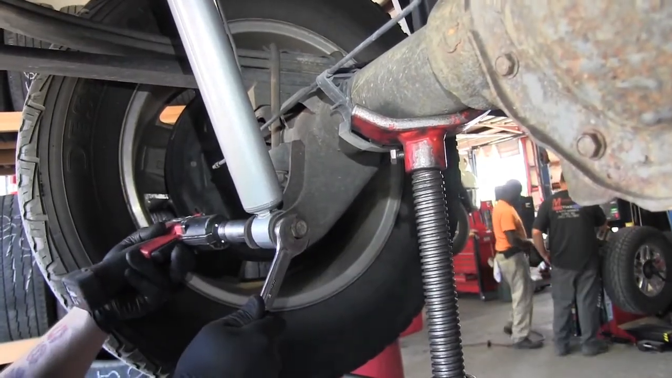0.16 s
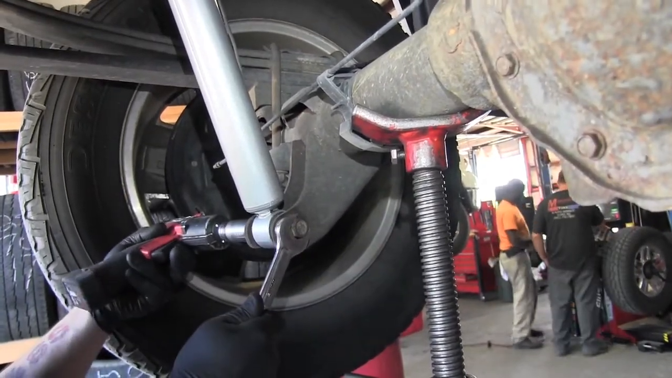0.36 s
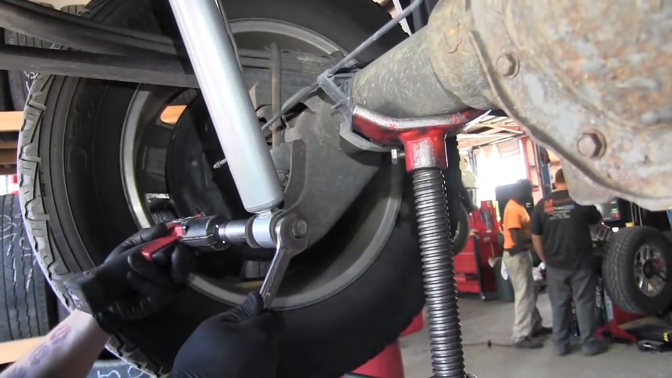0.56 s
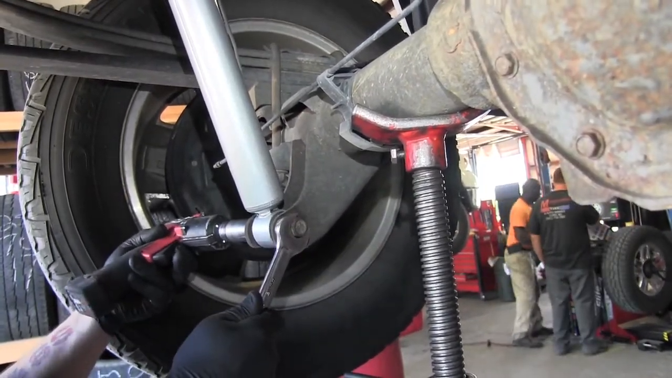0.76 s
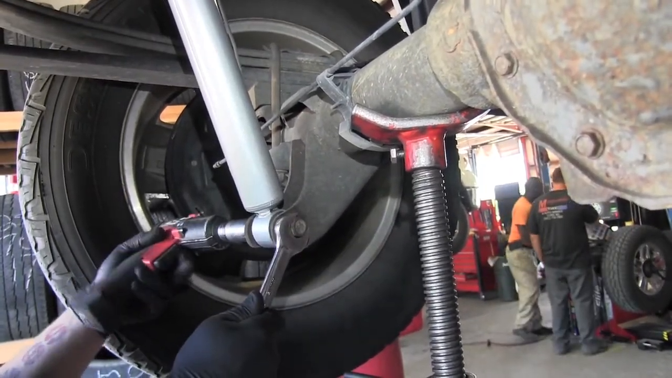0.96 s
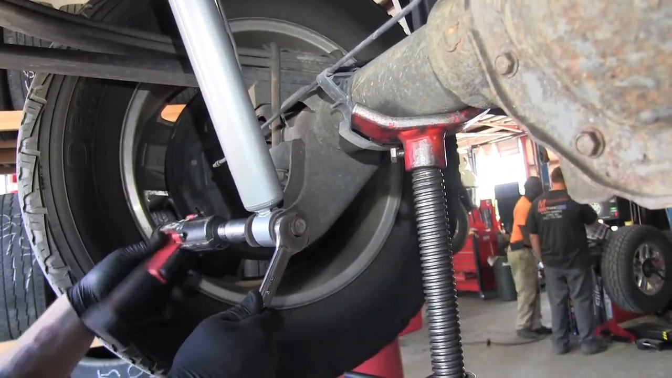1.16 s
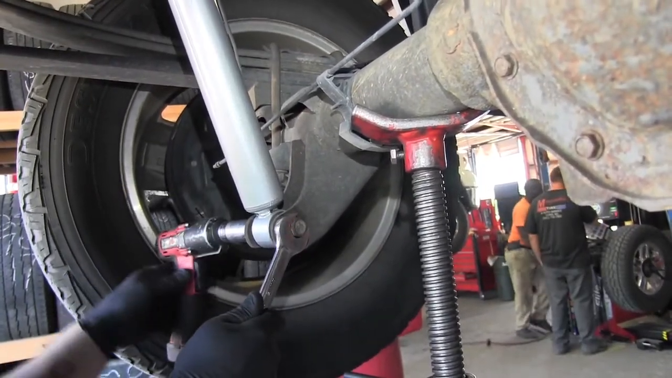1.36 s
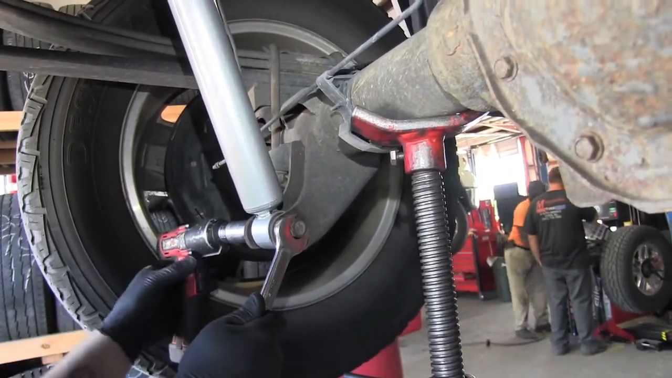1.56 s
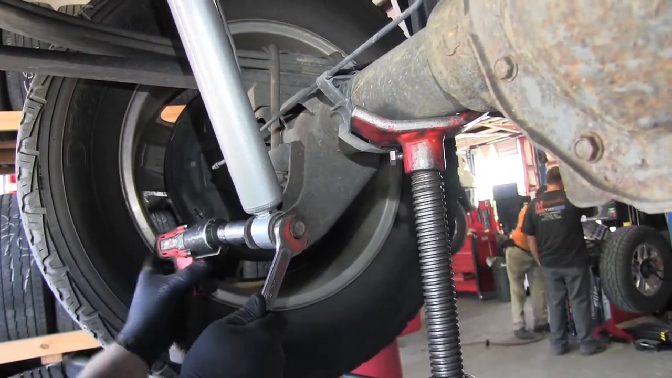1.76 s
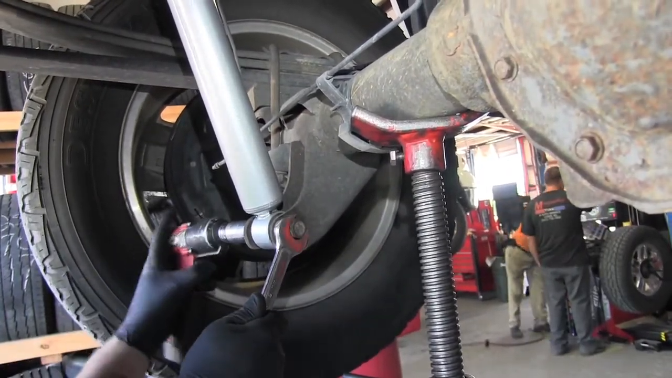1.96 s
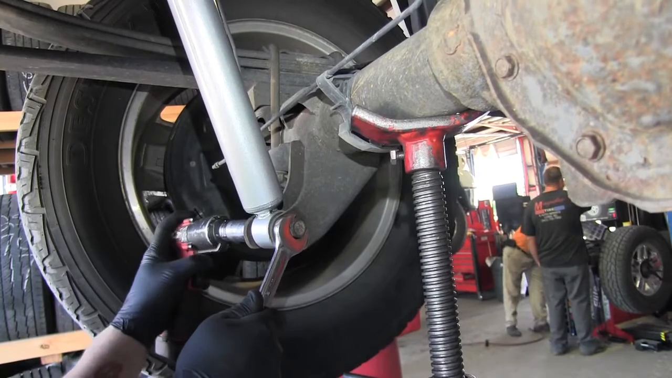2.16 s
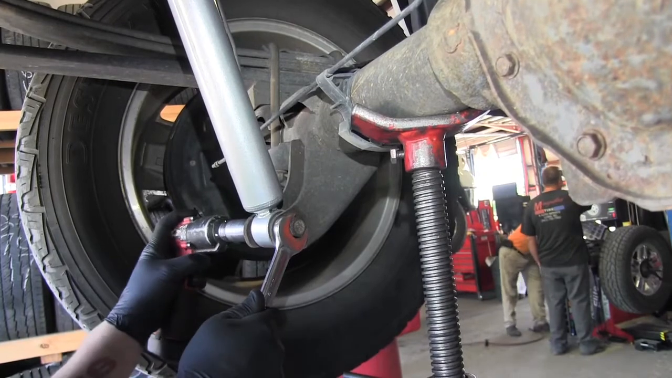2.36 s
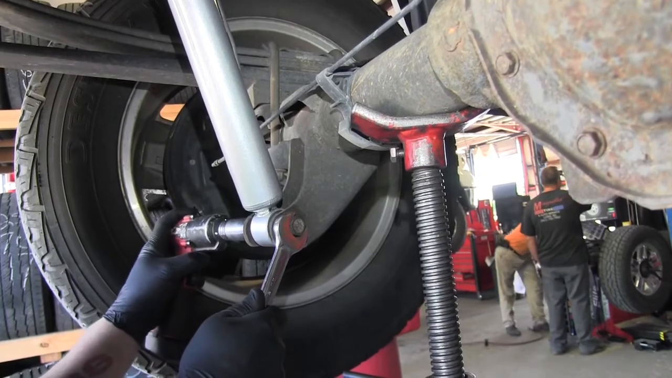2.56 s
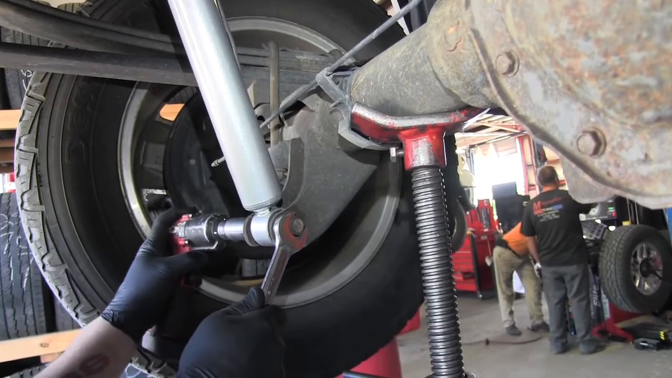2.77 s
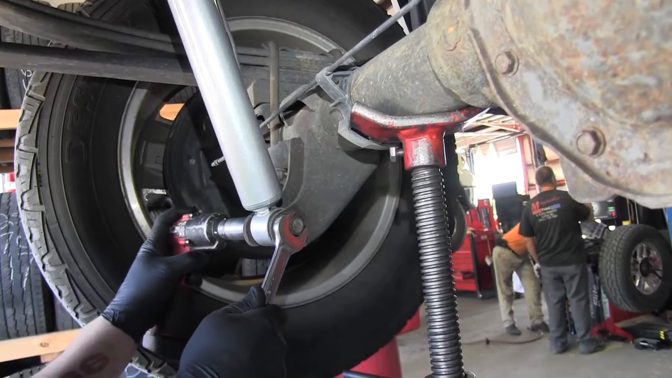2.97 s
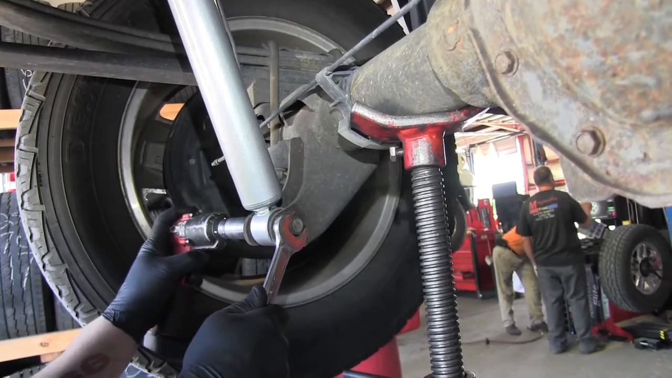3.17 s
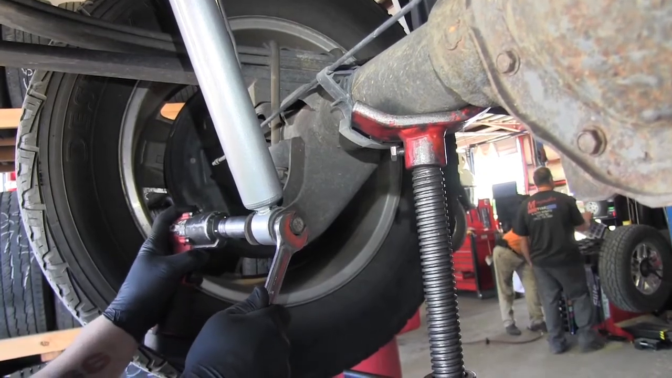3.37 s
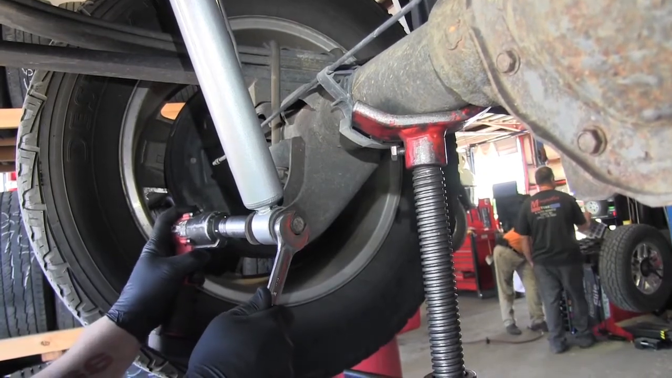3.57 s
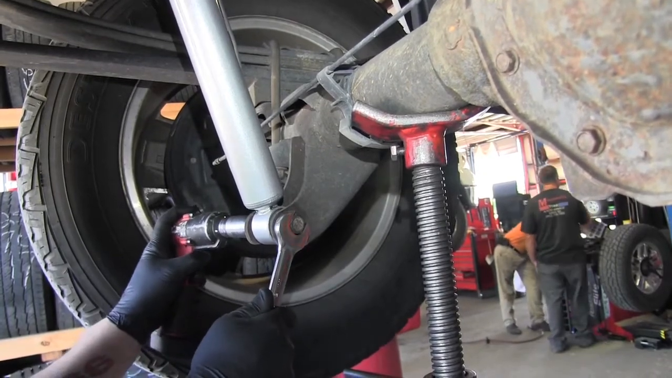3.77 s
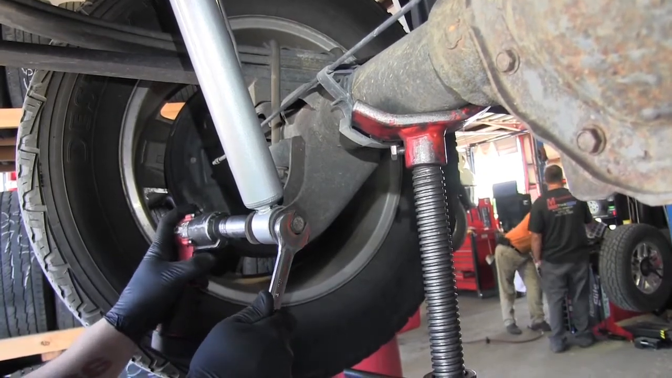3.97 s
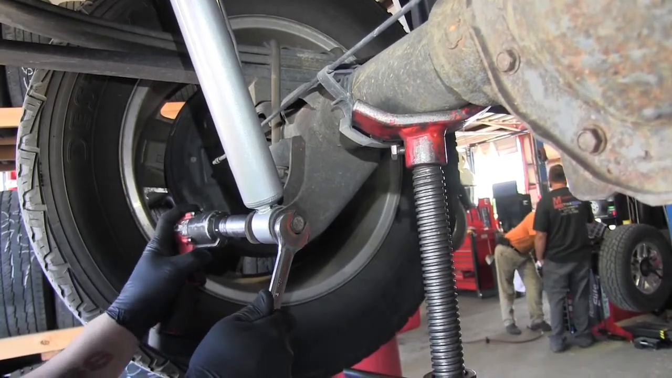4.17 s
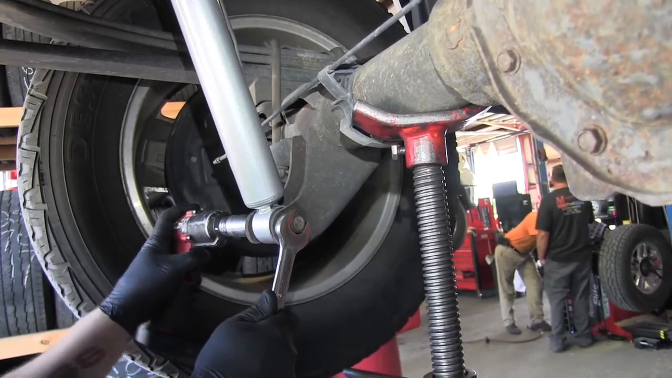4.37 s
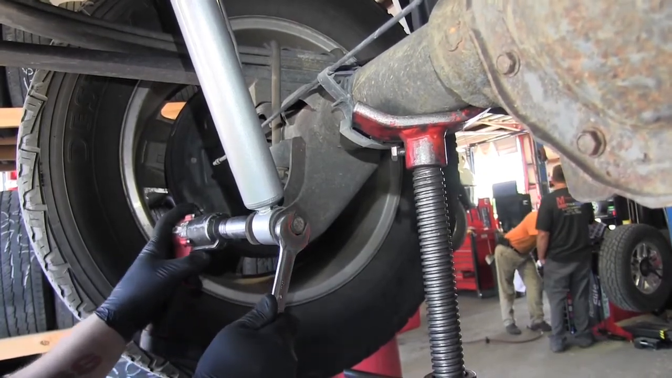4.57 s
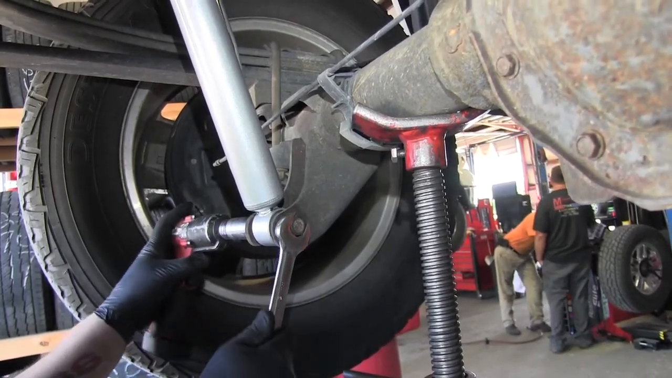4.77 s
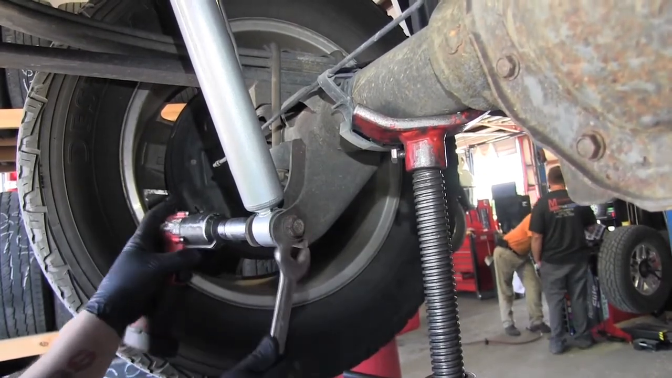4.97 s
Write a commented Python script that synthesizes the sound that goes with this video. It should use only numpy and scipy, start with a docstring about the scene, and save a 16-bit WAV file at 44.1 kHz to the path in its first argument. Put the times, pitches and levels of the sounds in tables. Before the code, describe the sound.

A power tool drives an axle bolt in three bursts of rapid metallic hammering and motor whirr, heard from close by. The first lasts about a second, with an overtone rising as it speeds up. In the pause come a socket knock and some glove scraping. The second burst is the longest, and the last is a quick blip. A low rumble, hum and faint hiss of the workshop lie underneath.

```python
"""A cordless impact driver hammers a bolt on a vehicle axle in three bursts, close up in a workshop.
Each blow chatters through the socket, bolt and axle, which ring; the motor whirrs between blows, and an
overtone rises as the first burst speeds up. After each burst the hall's noisy tail dies away over a faint
hiss. A low rumble and a hum lie underneath; glove and tool scrape, and the socket knocks as it reseats."""
import sys
import numpy as np
from scipy import signal
from scipy.fft import rfft, irfft, next_fast_len
from scipy.io import wavfile
from scipy.ndimage import uniform_filter1d, map_coordinates

SR = 44100
rng = np.random.default_rng(int(sys.argv[2]) if len(sys.argv) > 2 else 0)


def log_audio(samples):
    """Write samples as a 16-bit WAV file to the path given in sys.argv[1]."""
    # one column per channel
    frames = np.atleast_2d(samples).T
    # limit to full scale, then quantise
    limited = np.clip(frames, -1, 1)
    pcm = np.round(limited * 32767).astype(np.int16)
    wavfile.write(sys.argv[1], SR, pcm)


N = 221545

# Levels are relative: each layer adds its own trim.
# Faders while the trigger is held, one list a burst: t/s, whirr/dB, treble of the blows/dB,
# focus on the favoured ring/dB, then level/dB of each of the four AXLE_MODES parts
BURST_FADERS = [
    [(0, -23, -22, 5, -30, -25, -25, -37), (0.47, -26, -21, 5, -32, -25, -26, -40),
     (0.56, -25, -23, 7, -27, -29, -23, -47), (0.7, -21, -22.5, 5, -30, -36, -22, -47),
     (0.95, -21, -23.5, 5, -30, -36, -25, -40), (1.08, -21, -23, 6, -27, -33, -37, -25),
     (1.2, -27, -45, 6, -26, -29, -42, -47)],
    [(2.41, -32, -19.5, 12, -24, -28, -20, -26), (2.56, -22, -19.5, 15, -23, -33, -33, -32),
     (2.7, -24, -20.5, 17, -34, -33, -42, -28), (3.13, -22, -18, 13, -30, -33, -50, -31),
     (3.2, -23, -18, 14, -35, -24, -45, -31), (3.4, -22, -20, 16, -35, -23.5, -31, -29),
     (3.6, -21.5, -22.5, 14, -27, -27, -28, -19), (3.8, -21, -22, 13, -26, -27, -29, -18),
     (3.92, -22, -21, 12, -34, -26, -37, -21), (4.03, -18, -26, 9, -28, -27, -36, -24),
     (4.09, -32, -36.5, 9, -31.5, -28.5, -36, -27)],
    [(4.376, -36, -21, 18, -34, -30, -42, -18), (4.39, -28, -18.5, 18, -27, -26, -38, -15),
     (4.48, -20, -20, 16, -27, -26, -38, -18), (4.57, -20, -22.5, 15, -30, -25, -34, -23),
     (4.63, -28.5, -23, 11, -39, -44, -36, -31.5)],
]
CLATTER_EQ = [(290, -37), (500, 0), (641, -3.5), (786, 4), (1080, -1.5), (1410, -4), (2250, -1.5),
              (5980, -13.5), (7440, -19.5), (13200, -24), (16400, -34)]  # broad colour of motor and blows: f/Hz, level/dB
RUMBLE_FADERS = [(0, -35, -51), (0.6, -35.5, -52), (0.8, -36, -38), (1.0, -37, -55), (1.25, -36.5, -45),
                 (1.6, -42, -46), (1.9, -46, -38), (2.1, -43, -40), (2.17, -33, -37), (2.27, -39, -37),
                 (2.34, -35, -32), (2.39, -43, -36), (2.47, -32, -40), (2.6, -36, -54), (3.2, -43, -65),
                 (3.7, -45, -60), (4.1, -46, -57), (4.3, -52, -60), (4.65, -44, -58), (5.02, -60, -63)]  # the low bed: t/s, drone/dB, buffeting/dB
DRONE_EQ = [(65, -61), (110, -9.5), (180, -3), (270, -6), (400, -8), (480, -17), (700, -20), (910, -35),
            (1540, -120)]  # colour of the low drone: f/Hz, level/dB
BUFFET_EQ = [(15, -35.5), (30, -20), (60, -15), (100, 2.5), (140, -14), (250, -58.5)]  # colour of the deep buffeting: f/Hz, level/dB
HUM_FADER = [(0, -50), (1.45, -56), (2.3, -60), (4.1, -51), (4.32, -54), (4.68, -48), (5.02, -63)]  # the hum in the shop: t/s, level/dB
HUM_MODES = [(345, 50, -8), (440, 100, 0)]  # its resonant filter, applied twice: f/Hz, width/Hz, level/dB
# Uneven blows, as the hammer labours, catches or stalls: t/s, level/dB, favoured ring/Hz
UNEVEN_BLOWS = [(0.0202, -1, 2910), (0.0631, -2, 3800), (0.1052, -2, 2220), (0.1498, -0.5, 2900),
                (0.194, -2, 1700), (0.2397, -1, 1100), (0.2896, -1, 3800), (0.3296, -1, 3500),
                (0.3657, -1, 3800), (0.411, -0.5, 3790), (0.4483, -1, 2710), (0.4939, -2, 2340),
                (0.5108, -3, 2460), (0.5289, -2, 2980), (0.5497, -3, 2220), (1.0759, -5.5, 3050),
                (1.0984, -3, 2200), (1.1352, -4, 3460), (1.1638, -11, 2230), (1.1861, -14, 2710),
                (2.4083, -12, 3110), (2.4218, 0, 2290), (4.0166, -6, 3500), (4.0516, -8.5, 2230),
                (4.0695, -11, 2110), (4.3633, -24, 2260), (4.5698, -6, 5450), (4.5982, -7, 3720),
                (4.6072, -10, 5450)]
# Even hammering, one list a run, every row on a blow:
# t/s, blow rate up to the next row/Hz, level/dB, low ring/Hz, high ring/Hz, chance of the high ring (0-1)
EVEN_RUNS = [
    [(0.572, 50, -3, 2800, 4030, .6), (0.611, 52, -5.5, 2800, 4100, .5), (0.6891, 52, -5.5, 2700, 4500, .7),
     (0.7857, 52, -3, 2250, 4200, .55), (0.92, 52, -4, 2300, 3800, .55), (1.0549, 52, -4, 2200, 3640, .3)],
    [(2.4462, 50.5, -2, 2650, 4170, .15), (2.6436, 51, -3, 2410, 4170, .1),
     (2.7215, 52.5, -3.5, 2400, 4200, .1), (2.7784, 52, -3, 2380, 4500, .1),
     (2.8942, 52, -5, 2500, 5400, .5), (2.9905, 52, -5.5, 2700, 4900, .8),
     (3.1057, 53.5, -6, 2290, 5300, .6), (3.3661, 51.5, -5, 2300, 5500, .5),
     (3.4245, 54, -4, 2200, 5830, .8), (3.5537, 55, -4.5, 2300, 1550, .3),
     (3.6088, 55.5, -4, 2200, 5800, .15), (3.6984, 55, -3, 2200, 3510, .1),
     (3.8261, 53, -4, 2230, 5300, .2), (3.9952, 53, -6, 2200, 3530, .3)],
    [(4.3802, 50, -1, 2220, 3500, .05), (4.4585, 56, -3, 2200, 3500, .1),
     (4.494, 53.5, -3.5, 2120, 3500, .8), (4.5499, 53, -5, 2730, 3690, .7)],
]
ACCENT_BLOWS = [(0.6694, -2, 2710), (0.7083, -6, 4520), (0.7861, -4, 2210), (0.844, -3, 2210),
                (0.9388, -4, 2210), (0.9966, -3, 2910), (2.4462, 0, 2730), (2.4665, -3, 1700),
                (2.4867, -3, 2710), (2.5451, -2, 4170), (2.5646, -3, 2420), (2.644, -2, 2400),
                (2.683, -2, 2380), (2.7786, -1, 5400), (2.7974, -2, 2280), (2.819, -3, 2400),
                (2.9128, -3, 5700), (2.9517, -2, 5900), (3.0096, -2, 4790), (3.0474, -1, 2660),
                (3.1243, -5, 4930), (3.1807, -3, 2190), (3.2171, -2, 5850), (3.2354, -2, 5800),
                (3.3099, -3, 4910), (3.3473, -3, 5120), (3.3662, -2, 2640), (3.4241, -2, 5840),
                (3.4431, -1, 5830), (3.48, -2, 5810), (3.4984, 0, 2550), (3.5169, -4, 2730),
                (3.5538, -1, 2540), (3.5907, -3, 1520), (3.7337, -3, 5800), (3.8444, -3, 5800),
                (3.8814, -4, 5800), (3.9379, -3, 2860), (3.9759, -3, 2280), (4.4004, -3, 2220),
                (4.4194, -2, 2240), (4.4398, -3, 2120), (4.4937, -2, 3500), (4.5134, -3, 3470),
                (4.5311, -3, 2700)]  # standout blows within the runs: t/s, level/dB, favoured ring/Hz
RESEAT_KNOCKS = [(1.5273, -12, 1100), (1.6535, -33, 4240), (2.144, -26, 2070), (4.3278, -38.5, 5800)]  # the socket knocks on the bolt, and the hard start of a scrape at 2.144 s: t/s, level/dB, favoured ring/Hz
SOCKET_MODES = [(1095, 120, -11), (1510, 130, -9), (1715, 170, -9), (2090, 160, -4), (2260, 200, -3),
                (2420, 150, -3), (2708, 130, -5), (2900, 130, -4), (3515, 220, -3), (3800, 300, -3),
                (4200, 350, -4), (4560, 300, -8), (4900, 400, -6), (5400, 400, -7), (5850, 450, -6),
                (6600, 300, -10), (9330, 300, -15), (11150, 250, -15)]  # rings of socket and bolt: f/Hz, width/Hz, level/dB
AXLE_MODES = [
    [(108, 20, -9), (167, 40, -9), (225, 40, 5), (332, 40, 3)],
    [(430, 60, -8), (595, 50, -1), (652, 45, 0), (760, 70, -10)],
    [(860, 70, -3), (950, 70, 0), (1090, 90, 4)],
    [(1500, 67, -4), (2050, 200, -1), (2300, 200, 0)],
]  # housing, tube, bracket and bolt head, one list each: f/Hz, width/Hz, level/dB
LINGER_MODES = [(660, 12, -9), (2710, 7, 4)]  # narrow rings of axle tube and stand: f/Hz, width/Hz, level/dB
HALL_DECAY = [(200, 0.86), (1000, 0.26), (3000, 0.25), (8000, 0.15), (15000, 0.05)]  # reverb time of the hall: f/Hz, T60/s
OVERTONE_GLIDE = [(0.54, 830, -48), (0.59, 860, -34), (0.68, 925, -34), (0.78, 950, -39), (1.07, 960, -39),
                  (1.13, 940, -52)]  # a rising overtone of the hammering: t/s, f/Hz, level/dB
# The hall's noisy tail after each burst: start/s, end/s, opening level/dB, fade/(dB/s), steady hiss/dB
HALL_TAILS = [(1.2, 2.41, -33, 62, -47.5), (4.1, 4.37, -39, 95, -59), (4.64, 5.03, -38.5, 95, -57.5)]
PAUSE_EQ = [(250, -26), (450, -6), (800, 2.5), (1450, -3), (2000, 0.5), (4000, -5.5), (7000, -17),
            (14000, -31.5), (16000, -44)]  # colour shared by tail, hiss and scrapes: f/Hz, level/dB
# Scrapes of glove and tool: peak t/s, 20 dB rise/s, 20 dB fall/s, body/dB, treble/dB
GLOVE_SCRAPES = [(1.42, .1, .12, -60, -58), (1.71, .03, .06, -58, -60), (1.98, .04, .06, -54, -50),
                 (2.145, .17, .1, -36, -55), (2.205, .03, .3, -30.5, -44), (2.255, .08, .22, -26.5, -39)]

BLOW_SCATTER_DB, BLOW_JITTER_S, RING_SPREAD = 1.1, .00012, .03
SNAP_DB_PER_OCTAVE, KNOCK_FOCUS_DB = 6, 17  # high-ringing blows snap harder; focus of a knock
SNAP_TAIL_T60_S, RATTLE_T60_S = .054, .068  # the snap's tail shortens for rings above 2.3 kHz
SEATING_DRIFT_RAD = .35  # a blow: the socket's seating shifts, and with it the valleys between the rings
TAIL_TREBLE_DB, TREBLE_FADE_RATIO = -17, 1.2  # the hall tail's top is quieter and fades faster
SCRAPE_ABOVE_HZ, TOP_HZ = 1600, 16000


def amp(db):
    return 10 ** (np.asarray(db) / 20)


def unit(x):
    return x / np.sqrt(np.mean(x ** 2) + 1e-20)


def along(points, hz):
    """Read (f/Hz, value) points on a log frequency axis."""
    f, v = np.transpose(points)
    return np.interp(np.log(hz + 1), np.log(f + 1), v)


def faders(spans):
    """One dB curve per column, pulled down to -120 outside the spans."""
    rows = []
    for span in spans:
        off = [-120] * (len(span[0]) - 1)
        rows += [(span[0][0] - .01, *off), *span, (span[-1][0] + .01, *off)]
    s, *columns = np.transpose(rows)
    return [np.interp(np.arange(N) / SR, s, column) for column in columns]


def wobble(rate):
    """A smooth random curve, rate knots a second."""
    return map_coordinates(rng.standard_normal(int(N * rate / SR) + 4), [np.arange(N) * rate / SR])


def filtered(x, response):
    """Shape x with a complex frequency response."""
    size = next_fast_len(x.shape[-1] + 4096)
    return irfft(rfft(x, size) * response(np.fft.rfftfreq(size, 1 / SR)), size)[..., :x.shape[-1]]


def modes(table, hz):
    """One causal resonance per row, signs alternating."""
    centre, width, db = np.transpose(table)[:, :, None]
    sign = (-1.) ** np.arange(len(centre))[:, None]
    return sign * amp(db) * 1j * hz * width / (centre ** 2 - hz ** 2 + 1j * hz * width)


def stereo_noise(side_db, shape=(N,)):
    """Mid/side noise; side_db sets the width."""
    mid, side = rng.standard_normal((2, *shape))
    return np.array([mid + amp(side_db) * side, mid - amp(side_db) * side])


def highpass(hz, corner_hz):
    return 1 / (1 + (corner_hz / (hz + 1)) ** 4)


def motor(whirr_db):
    """Gears and brushes hiss between the blows, thinned out below the steel's ring."""
    colour = lambda hz: amp(along(CLATTER_EQ, hz)) * (.3 + highpass(hz, 1300))
    return amp(whirr_db - 3.5 + .64 * wobble(60)) * unit(filtered(stereo_noise(side_db=-17), colour))


def rumble():
    """The low bed: a wavering noise drone over slower, deeper buffeting."""
    drone_db, buffet_db = faders([RUMBLE_FADERS])
    drone = unit(filtered(stereo_noise(side_db=-17), lambda hz: amp(along(DRONE_EQ, hz))))
    buffet = unit(filtered(stereo_noise(side_db=-10), lambda hz: amp(along(BUFFET_EQ, hz))))
    return amp(drone_db + 2.3 * wobble(12)) * drone + amp(buffet_db - 4.5 + 1.3 * wobble(4)) * buffet


def shop_hum():
    """A blurred hum: noise through two low-mid resonances."""
    hum = unit(filtered(stereo_noise(side_db=-12), lambda hz: modes(HUM_MODES, hz).sum(axis=0) ** 2))
    hum_db, = faders([HUM_FADER])
    return amp(hum_db + 1.5 * wobble(10)) * hum


def blow_pattern():
    """The hammer's rhythm, uneven blows and near-even runs: t/s, level/dB, favoured ring/Hz."""
    blows = [np.array(UNEVEN_BLOWS)]
    for run in EVEN_RUNS:
        s, rate, db, low_hz, high_hz, chance = np.transpose(run)
        count = np.append(0, np.cumsum(np.round(np.diff(s) * rate[:-1])))
        turn = np.arange(count[-1] + 1)
        jitter, scatter, detune = rng.standard_normal((len(turn), 3)).T
        row = np.floor(np.interp(turn, count, np.arange(len(s)))).astype(int)
        rings_high = rng.random(len(turn)) < chance[row]
        times = np.interp(turn, count, s) + BLOW_JITTER_S * jitter
        levels = np.interp(turn, count, db) + BLOW_SCATTER_DB * scatter
        ring_hz = np.where(rings_high, high_hz[row], low_hz[row]) * np.exp(RING_SPREAD * detune)
        blows.append(np.transpose([times, levels, ring_hz]))
    blows = np.vstack(blows)
    for accent in ACCENT_BLOWS:  # each takes the place of the nearest blow
        blows[np.argmin(abs(blows[:, 0] - accent[0]))] = accent
    return blows


def socket_chatter(blows, treble_db, focus_db):
    """Steel on steel: each blow or knock snaps near its favoured ring, rattles, and spits treble."""
    s, db, favour_hz = np.vstack([blows, RESEAT_KNOCKS]).T[:, :, None]
    t = np.arange(SR // 10) / SR
    start = np.round(s * SR).astype(int)
    shape = (len(s), len(t))
    attack = 1 - np.exp(-t * (favour_hz / 2300).clip(1) ** 2.5 / .001)  # low rings start softer
    swell = 1 - np.exp(-t / .0013)  # the rattle builds just after the snap
    # neighbouring blows land alike, so their grain changes slowly from one to the next
    grain = unit(uniform_filter1d(stereo_noise(side_db=-9, shape=shape), size=4, axis=1))
    octaves = np.log2(favour_hz / 2300).clip(0)
    crack = attack * amp(1 + SNAP_DB_PER_OCTAVE * octaves - 60 * t / .011)
    tail = swell * amp(-60 * t * 2.6 ** octaves / SNAP_TAIL_T60_S)
    snap = grain * (crack + tail)
    rattle = grain * swell * amp(.5 - 60 * t / RATTLE_T60_S)
    spit_envelope = (1 - np.exp(-t / .0005)) * (amp(-60 * t / .012) + amp(4 - 60 * t / .072))
    spit = stereo_noise(side_db=-10, shape=shape) * spit_envelope

    nearness = np.exp(-np.log(np.array(SOCKET_MODES)[:, 0] / favour_hz) ** 2 / .009)
    mode_gains = amp(2 * rng.standard_normal(nearness.shape))
    focused = mode_gains * amp(np.where(focus_db[start] > 0, focus_db[start], KNOCK_FOCUS_DB) * nearness)
    seating = np.exp(1j * np.cumsum(SEATING_DRIFT_RAD * rng.standard_normal(s.shape), axis=0))
    clatter = lambda hz: amp(along(CLATTER_EQ, hz)) * highpass(hz, 1240)
    body = lambda hz: seating * amp(3) * clatter(hz) * (1 - highpass(hz, 5800))
    ring = (filtered(snap, lambda hz: focused @ modes(SOCKET_MODES, hz) + body(hz))
            + filtered(rattle, lambda hz: mode_gains @ modes(SOCKET_MODES, hz) + body(hz)))
    ring /= np.sqrt(np.mean(ring ** 2, axis=(0, 2), keepdims=True))
    spit = unit(filtered(spit, lambda hz: clatter(hz) * highpass(hz, 5210)))

    scatter_db = 1.85 * rng.standard_normal(s.shape)
    # between bursts a knock keeps a set share of treble
    spit_gain = np.maximum(amp(treble_db[start] - 9 + scatter_db), amp(db - 39))
    hits = amp(db - 21.5) * ring + spit_gain * spit
    at = start + np.arange(len(t))
    return np.array([np.bincount(at.ravel(), channel.ravel(), N + len(t))[:N] for channel in hits])


def axle_thuds(times, parts_db):
    """Every blow pushes the axle the same way, so its modes sound as overtones of the blow rate."""
    at = np.round(times * SR).astype(int)
    push = np.zeros(N)
    push[at] = amp(1.1 * rng.standard_normal(len(at)))
    rings = [unit(filtered(push, lambda hz: modes(part, hz).sum(axis=0) * highpass(hz, 85)))
             for part in AXLE_MODES]
    return sum(amp(db - 9) * ring for db, ring in zip(parts_db, rings))


def lingering_ring(tool):
    """The axle tube and the stand pick up the tool's sound and hold a long, thin ring."""
    return filtered(tool, lambda hz: modes(LINGER_MODES, hz).sum(axis=0))


def hall(x):
    """The hall answers after a short pre-delay; its lows hang on longest."""
    hz, t, spectrum = signal.stft(rng.standard_normal((2, SR // 2)), SR, nperseg=256)
    tail = signal.istft(spectrum * amp(-60 * t / along(HALL_DECAY, hz)[:, None]), SR, nperseg=256)[1]
    return signal.fftconvolve(np.pad(x, (300, 0))[None], tail / np.linalg.norm(tail[0]), axes=1)[:, :N]


def rising_overtone():
    """An overtone of the hammering, played as a wavering sine, climbs as the blows speed up."""
    s, hz, db = np.transpose(OVERTONE_GLIDE)
    t = np.arange(N) / SR
    pitch = np.interp(t, s, hz) * (1 + .008 * wobble(40))
    level = amp(np.interp(t, s, db, left=-120, right=-120) + 3 + 2.5 * wobble(35))
    return level * np.sin(2 * np.pi * np.cumsum(pitch) / SR)


def tails_and_scrapes():
    """The hall's noisy tail dies away over a faint hiss; glove and tool scrape in the first pause."""
    t = np.arange(N) / SR
    tail, scrape = np.zeros((2, 2, N))  # each holds two gains: body, treble
    for start, end, db, fade_db_per_s, hiss_db in HALL_TAILS:
        fading = amp(db - fade_db_per_s * (t - start).clip(0) * np.array([[1], [TREBLE_FADE_RATIO]]))
        tail += ((t > start) & (t < end)) * (fading + amp(hiss_db)) * amp([[0], [TAIL_TREBLE_DB]])
    for s, rise, fall, db, treble_db in GLOVE_SCRAPES:
        scrape += amp(np.array([[db], [treble_db]]) + 20 * np.minimum((t - s) / rise, (s - t) / fall))
    scrape *= t < HALL_TAILS[0][1]
    noise = filtered(stereo_noise(side_db=-6), lambda hz: amp(along(PAUSE_EQ, hz)))
    treble = filtered(noise, lambda hz: highpass(hz, 6440))
    body = noise - treble
    steely = lambda hz: (.15 + highpass(hz, SCRAPE_ABOVE_HZ)) * (.9 + modes(SOCKET_MODES, hz).sum(axis=0))
    thin = filtered(body, steely)
    mix = tail[0] * unit(body) + scrape[0] * unit(thin) + (tail[1] + scrape[1]) * unit(treble)
    return amp(wobble(30)) * mix


def scene():
    """The driver and its reverb sit a touch to the right, over rumble, hum, tails and scrapes."""
    whirr_db, treble_db, focus_db, *parts_db = faders(BURST_FADERS)
    blows = blow_pattern()
    tool = socket_chatter(blows, treble_db, focus_db) + axle_thuds(blows[:, 0], parts_db)
    tool += motor(whirr_db) + rising_overtone()
    tool += lingering_ring(tool)
    tool += amp(-10) * hall(tool.mean(axis=0))
    return tool * amp([[-.6], [.6]]) + rumble() + shop_hum() + tails_and_scrapes()


def record(dry):
    """A soft clip rounds off the highest peaks; a steep low-pass trims the top."""
    soft = dry / (1 + np.abs(dry) ** 6) ** (1 / 6)
    return filtered(soft, lambda hz: 1 / (1 + (hz / TOP_HZ) ** 120))


dry = scene()
out = record(dry)
log_audio(out)
```